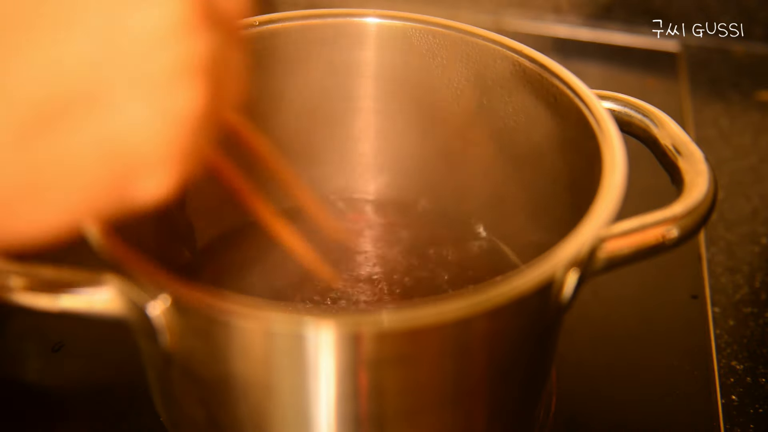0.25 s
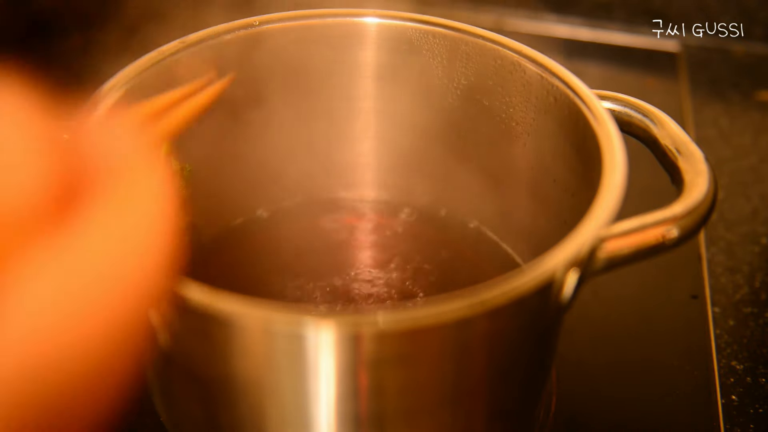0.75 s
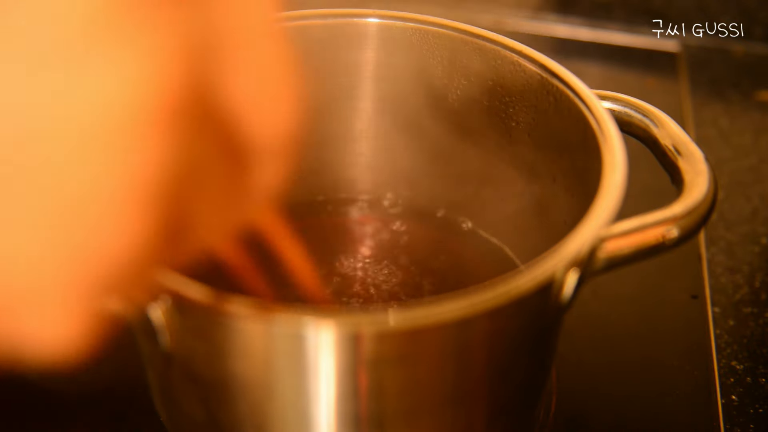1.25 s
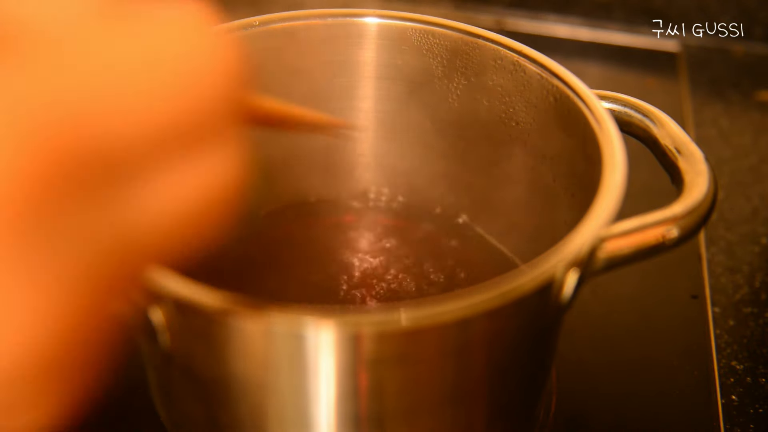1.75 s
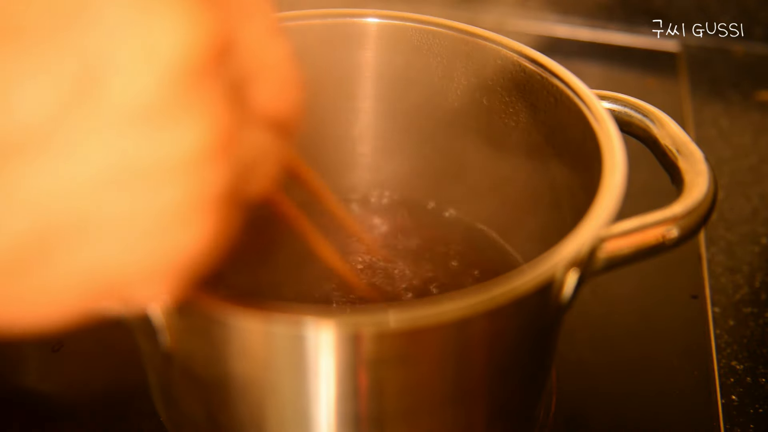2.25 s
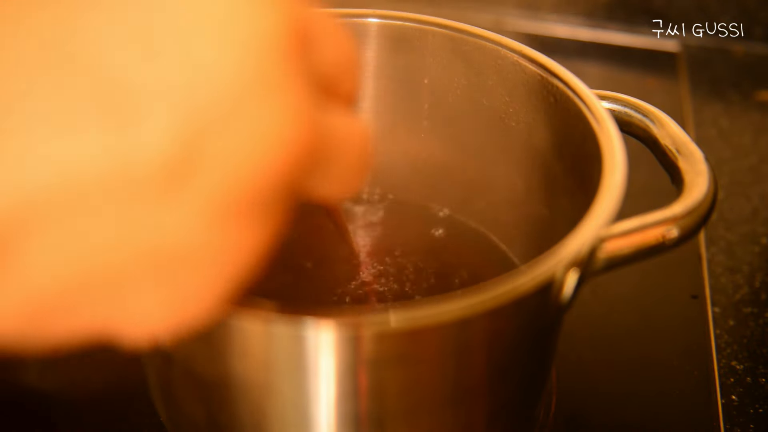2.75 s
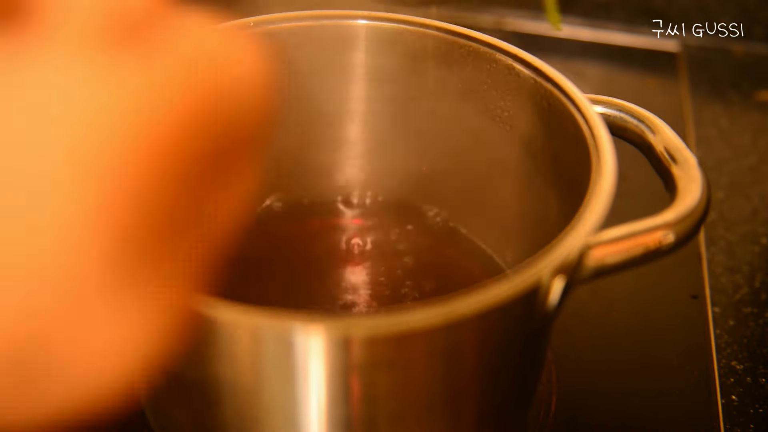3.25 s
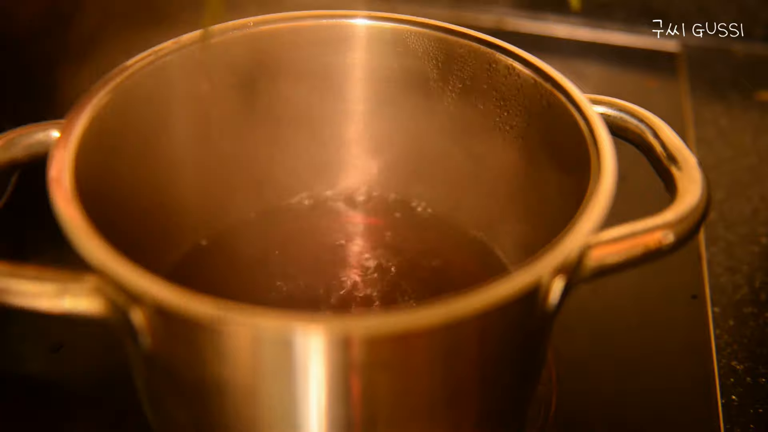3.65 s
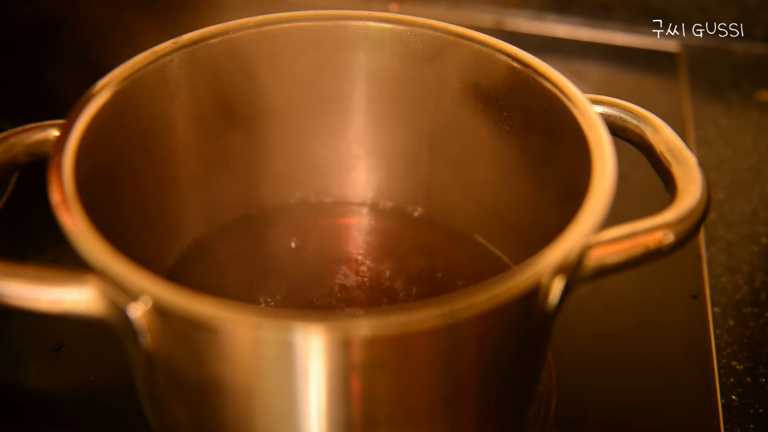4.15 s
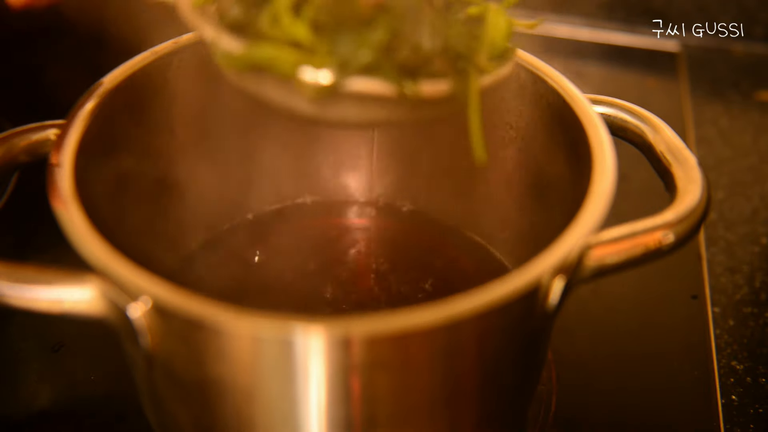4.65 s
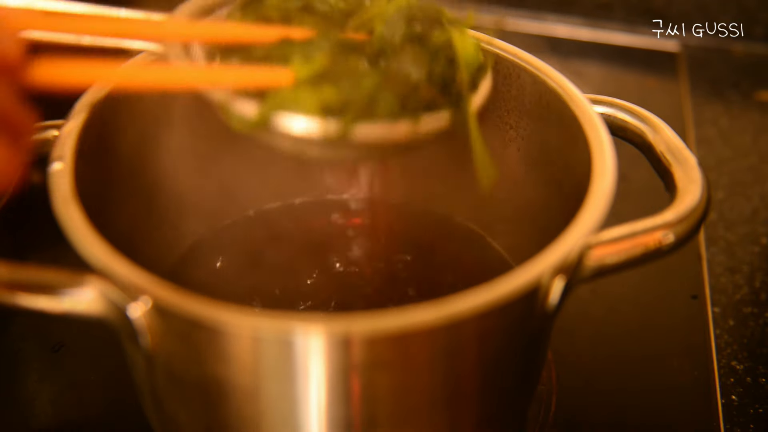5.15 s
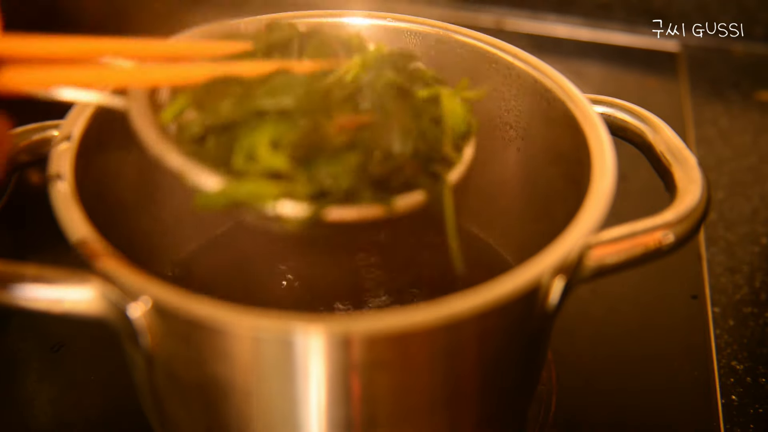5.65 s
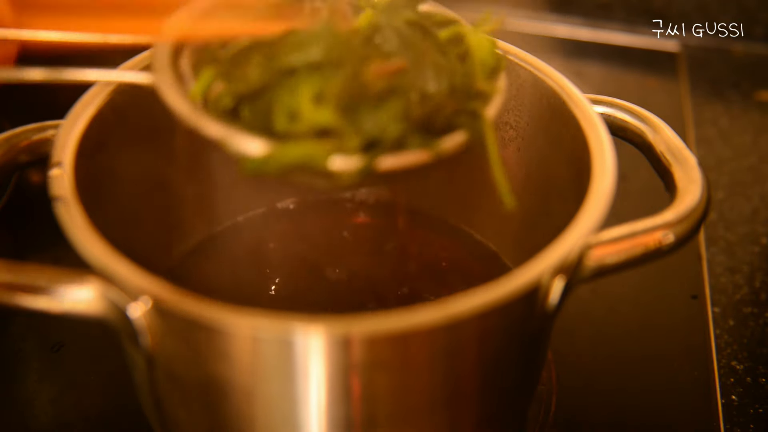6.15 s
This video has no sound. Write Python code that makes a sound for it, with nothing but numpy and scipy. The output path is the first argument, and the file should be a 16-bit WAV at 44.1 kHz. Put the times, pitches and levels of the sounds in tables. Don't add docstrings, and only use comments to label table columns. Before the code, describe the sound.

A faint steady boil murmurs in a metal pot, with airy hiss and fine spitting above it. Wooden sticks make light knocks and small bright ticks, with one loud steel clank early and a sharp tick around four seconds. After a calmer stretch, a strainer is shaken and tapped near five seconds, rattling thinly, and again near six, with watery plinks and plops. Close mono pickup, short soft room reflection.

```python
import sys
import numpy as np
from scipy import signal
from scipy.fft import rfft, irfft, next_fast_len
from scipy.io import wavfile
from scipy.ndimage import uniform_filter1d, map_coordinates

SR = 44100
rng = np.random.default_rng(int(sys.argv[2]) if len(sys.argv) > 2 else 0)


def wrap_up_sound(samples):
    columns = np.atleast_2d(samples).T
    tamed = np.clip(columns, -1, 1)
    steps = np.round(tamed * 32767).astype(np.int16)
    wavfile.write(sys.argv[1], SR, steps)


def convert_level_to_amplitude(level_db):
    exponent = np.asarray(level_db, float) / 20
    return 10 ** exponent


N = 281799


def unit(x):
    return x / np.sqrt(np.mean(x ** 2) + 1e-20)


def along(points, hz):
    f, value = np.transpose(points)
    return np.interp(np.log(hz + 1), np.log(f + 1), value)


def curve(rows):
    s, value = np.transpose(rows)
    return np.interp(np.arange(N) / SR, s, value)


def wobble(rate):
    knots = rng.standard_normal(int(N * rate / SR) + 4)
    return map_coordinates(knots, [np.arange(N) * rate / SR])


def filtered(x, response):
    m = next_fast_len(len(x) + 8192)
    return irfft(rfft(x, m) * response(np.fft.rfftfreq(m, 1 / SR)), m)[:len(x)]


def peak(f, hz, width_hz):
    return 1j * f * width_hz / (hz * hz - f * f + 1j * f * width_hz)


def add(track, s, sound):
    track[round(s * SR):][:len(sound)] += sound


def fizz(response, patchy_db, grain_db, grain_rate):
    z = signal.stft(rng.standard_normal(N), nperseg=2048)[2]
    field = uniform_filter1d(rng.standard_normal(z.shape), size=2, axis=0)
    field = uniform_filter1d(field, size=3, axis=1)
    patches = convert_level_to_amplitude(patchy_db * np.clip(unit(field), -3, 1.8))
    bed = unit(signal.istft(z * patches, nperseg=2048)[1][:N])
    grains = (rng.random(N) < grain_rate / SR) * np.clip(rng.standard_normal(N), -2, 2)
    return unit(filtered(bed + convert_level_to_amplitude(grain_db) * unit(grains), response))


def ring(modes, t, age, rough):
    knots = rng.standard_normal((len(modes), 2, len(t) // 180 + 2))
    total = 0
    for (hz, db, t60), (a, b) in zip(modes, knots):
        drift = np.interp(t * SR / 180, np.arange(len(a)), a + 1j * b)
        waver = 1 + rough * min(hz / 3500, 1) * drift
        total = total + convert_level_to_amplitude(db - 60 * age / t60) * np.imag(waver * np.exp(2j * np.pi * hz * t))
    return total


# f/Hz, width/Hz, level/dB
WALL = [(600, 21, -3.5), (1560, 27, 2), (3490, 22, 1), (4000, 29, -11), (4600, 23, -4), (6030, 83, 8)]


def wall(f):
    return 1 + 0.31 * sum(convert_level_to_amplitude(db) * abs(peak(f, hz, width)) for hz, width, db in WALL)


# t/s, level/dB
CHURN = [(0.0, -55), (0.1, -55), (0.55, -57.5), (1.05, -57.5), (1.33, -55), (1.94, -57.5), (2.13, -56.5),
         (3.01, -58), (3.47, -58), (4.41, -57.5), (4.63, -57), (5.2, -56), (5.48, -59), (5.73, -59.5),
         (6.01, -58), (6.39, -60.5)]
# f/Hz, level/dB per Hz
BOIL = [(180, -42), (300, -17), (362, -8), (404, -7.5), (429, -7.5), (603, -2), (668, -3.5), (820, -7.5),
        (901, -12.5), (1430, -13), (1570, -9.5), (1750, -16), (2300, -20), (2990, -32), (5060, -120)]


def boil():
    noise = fizz(lambda f: convert_level_to_amplitude(along(BOIL, f)) * wall(f), patchy_db=2.5, grain_db=-12, grain_rate=160)
    return convert_level_to_amplitude(curve(CHURN) + 1.74 + 0.55 * wobble(22)) * noise


# f/Hz, level/dB per Hz
RUMBLE = [(12, -45), (20, -8), (151, 0.5), (207, -3), (241, -2.5), (314, -3), (350, -7.5), (460, -25),
          (770, -120)]
RUMBLE_DB, RUMBLE_FOLLOWS = -62.5, 0.79


def rumble():
    churn_db = curve(CHURN)
    level_db = RUMBLE_DB + RUMBLE_FOLLOWS * (churn_db - churn_db.mean())
    return convert_level_to_amplitude(level_db) * fizz(lambda f: convert_level_to_amplitude(along(RUMBLE, f)), patchy_db=2.5, grain_db=-14, grain_rate=27)


# t/s of the crest, level/dB over the lull, length/s
SURGES = [(0.13, 4, 0.49), (0.65, 4, 0.31), (1.202, 3, 0.74), (1.64, 3.5, 0.38), (2.13, 5, 0.33),
          (2.66, 5, 0.29), (3.18, 3.5, 0.53), (3.793, 4.5, 0.33), (4.34, 3.5, 0.24), (4.912, 4.5, 0.25),
          (5.445, 3, 0.82), (5.92, 1, 0.67), (6.19, 5, 0.34)]
BUILD_SHARE = 0.53


def surging(late_s):
    t = np.linspace(0, N / SR, num=1000)
    s, db, length = np.transpose(SURGES)[:, :, None]
    crest = s + late_s
    half = length * np.where(t < crest, BUILD_SHARE, 1 - BUILD_SHARE)
    height_db = (db * np.exp(-((t - crest) / half) ** 2)).sum(axis=0)
    return np.interp(np.arange(N) / SR, t, height_db)


# f/Hz, level/dB per Hz
STEAM = [(1180, -36), (2000, -15.5), (2790, -5), (3590, -2), (3890, -1), (4310, -0.5), (4520, -3.5),
         (4670, -2), (5400, -12.5), (7020, -39), (11900, -120)]
LULL_DB = -59


def steam():
    noise = fizz(lambda f: convert_level_to_amplitude(along(STEAM, f)) * wall(f), patchy_db=3.5, grain_db=-17.5, grain_rate=400)
    return convert_level_to_amplitude(LULL_DB + 1.085 * surging(0) + 0.58 + 0.17 * wobble(12)) * noise


# f/Hz, level/dB per Hz
SEETHE = [(3120, -35), (5300, -5), (5540, -3.5), (6520, 1), (7400, -8), (9620, -45), (16300, -120)]
SEETHE_DB, SEETHE_FOLLOWS = -64.5, 0.91


def seethe():
    noise = fizz(lambda f: convert_level_to_amplitude(along(SEETHE, f)), patchy_db=5.5, grain_db=-6.5, grain_rate=300)
    return convert_level_to_amplitude(SEETHE_DB + SEETHE_FOLLOWS * surging(0)) * noise


# f/Hz, level/dB per Hz
SPIT = [(6820, -26), (11600, -4.5), (13100, 3), (15300, -2.5), (15800, -2.5)]
SPIT_DB, SPIT_YIELDS = -59.5, 0.78
SPIT_LATE_S = -0.0054
COVERED_S, COVER_DB = 4.5, -1.5


def spit():
    covered = np.clip((np.arange(N) / SR - COVERED_S) / 0.08, 0, 1)
    level_db = SPIT_DB - SPIT_YIELDS * surging(SPIT_LATE_S) + COVER_DB * covered
    return convert_level_to_amplitude(level_db) * fizz(lambda f: convert_level_to_amplitude(along(SPIT, f)), patchy_db=1.5, grain_db=-10, grain_rate=600)


# t/s, level/dB, f/Hz
GURGLES = [(0.103, -42, 570), (0.177, -41.5, 610), (0.205, -47, 640), (0.225, -39.5, 577),
           (0.272, -44, 554), (0.424, -51, 560), (0.466, -50, 640), (0.633, -53, 603), (0.714, -46, 656),
           (1.047, -44, 592), (1.133, -39, 650), (1.273, -40.5, 590), (1.319, -49, 585), (1.445, -44, 577),
           (1.584, -51, 614), (2.076, -57, 570), (2.113, -39, 610), (2.138, -43, 505), (2.172, -42.5, 635),
           (2.221, -36.5, 624), (2.274, -40, 630), (2.339, -45, 575), (2.419, -50, 600), (2.467, -50, 630),
           (2.485, -43, 596), (2.719, -45, 643), (2.756, -42, 574), (2.977, -48, 700), (3.023, -45, 600),
           (3.219, -45, 560), (3.285, -44, 635), (3.805, -49, 594), (4.005, -46, 565), (4.069, -44, 622),
           (4.118, -45, 660), (4.137, -43, 586), (4.248, -49, 635), (4.385, -52, 762), (4.708, -45, 615),
           (4.827, -51, 290), (4.856, -49, 236), (4.887, -53, 125), (4.9, -45, 620), (4.972, -49, 452),
           (5.037, -47, 590), (5.211, -39, 700), (5.982, -55, 577), (6.07, -45, 740), (6.35, -50, 719)]
GURGLE_CYCLES, GURGLE_RISE_S, GURGLE_DB = 17.6, 0.0037, -5


def gurgles():
    out, t = np.zeros(N + SR), np.arange(SR // 16) / SR
    for s, db, hz in GURGLES:
        shape = convert_level_to_amplitude(-60 * t * hz / GURGLE_CYCLES) * (1 - np.exp(-t / GURGLE_RISE_S))
        tone = np.sin(2 * np.pi * hz * t * (1.01 - 1.0 * t) + 6 * rng.random())
        add(out, s, convert_level_to_amplitude(db + GURGLE_DB) * shape / shape.max() * tone)
    return out[:N]


# t/s, level/dB, f/Hz
DROPS = [(0.052, -32.5, 1560), (0.544, -40.5, 1560), (0.9628, -28.5, 1570), (1.6006, -34.5, 1580),
         (2.247, -34, 1510), (2.656, -42, 1760), (2.835, -32.5, 1560), (4.146, -40.5, 1560),
         (1.198, -29.5, 1800), (4.2511, -35.5, 2270), (4.7048, -38, 1480), (4.816, -42, 1560),
         (5, -37, 1500), (5.1261, -46, 1440), (5.147, -36, 1560), (5.212, -33, 1510), (6.368, -40, 1560),
         (0.1336, -50, 1550), (0.3436, -44, 1680), (0.9128, -48, 1610), (1.7953, -50, 1550),
         (2.0572, -49, 1520), (2.372, -56, 1560), (2.5192, -50, 1550), (2.9008, -54, 1580),
         (2.9751, -49, 1390), (2.9941, -42, 1300), (3.052, -48, 1300), (4.098, -46, 1530),
         (4.5906, -46, 1560), (5.253, -42, 1570), (5.447, -48, 1560), (5.911, -43, 1580),
         (6.116, -52, 1370), (6.178, -41, 1370), (6.353, -45, 1350)]
# t/s, level/dB, f/Hz
PLOPS = [(4.5171, -45, 600), (4.7461, -48, 800), (5.9081, -34, 814), (5.9095, -35, 1130),
         (5.9361, -43, 760), (6.0856, -44, 729), (6.1171, -42, 1010), (6.1221, -42, 805),
         (6.1421, -39, 720), (6.1721, -44, 745), (6.1851, -34.5, 734), (6.2151, -50, 680)]
# t/s, level/dB, f/Hz
TINKS = [(0.0496, -40, 2580), (1.1975, -34, 2930), (1.205, -41, 2520), (2.4285, -41, 3700),
         (2.9936, -44, 2620), (3.3537, -37.5, 3300), (3.7871, -44, 3000), (4.2524, -33.5, 3900),
         (4.6531, -40.5, 2700), (4.7046, -45, 2600), (5.1474, -39, 2800), (5.176, -45, 2500),
         (5.4471, -31.5, 2500), (5.4486, -38, 3100), (5.9091, -34.5, 3330), (6.0591, -43, 3300),
         (6.0848, -31.5, 3320), (6.0893, -37, 3220)]
BUBBLE_CYCLES = 44, 35, 49
SPLASH_DB = 2, 10, 1
LANDING_DB = -6


def drops():
    out, t = np.zeros(N + SR), np.arange(SR // 8) / SR
    for rows, splash_db, cycles in zip((DROPS, PLOPS, TINKS), SPLASH_DB, BUBBLE_CYCLES):
        for s, db, hz in rows:
            t60 = cycles / hz
            shape = convert_level_to_amplitude(-60 * t / t60) * (1 - np.exp(-t / 0.00045))
            tone = shape * np.sin(2 * np.pi * hz * t * (0.981 + 1.6 * t))
            spray = rng.standard_normal(len(t)) * convert_level_to_amplitude(splash_db - 60 * t / t60)
            splash = filtered(spray, lambda f: peak(f, 1.08 * hz, 0.54 * hz) * peak(f, 1.08 * hz, 1.7 * hz))
            landing = rng.standard_normal(len(t)) * convert_level_to_amplitude(LANDING_DB - 60 * t / 0.0094)
            click = filtered(landing, lambda f: peak(f, 1430, 2600) ** 2)
            add(out, s + 0.00017, convert_level_to_amplitude(db - 2.0) * (tone + splash + click))
    return out[:N]


# f/Hz, level/dB, t60/s
RIM = [(155, -29.5, 0.11), (250, -30, 0.079), (347, -26, 0.061), (560, -36.5, 0.13), (700, -37, 0.19),
       (895, -32, 0.17), (1048, -28.5, 0.18), (1230, -27.5, 0.19), (1390, -34, 0.092), (1580, -30, 0.34),
       (2577, -25.5, 0.28), (2755, -24, 0.1), (3515, -25, 0.28), (3620, -26, 0.22), (3990, -25, 0.33),
       (3900, -26, 0.23), (4600, -36, 0.43), (4950, -29, .2), (5190, -17, 0.18), (5320, -28, 0.19),
       (6212, -17, 0.12), (6840, -34, .18), (7200, -30, .15), (7660, -23, 0.15), (8177, -25, 0.15),
       (8600, -40, .12)]
# f/Hz, level/dB, t60/s
SIDE_WALL = [(635, -27, 0.36), (1550, -4.5, 0.27), (2410, -14, .08), (2700, -9, 0.087), (3068, -12, .1),
             (3550, -31, 0.27), (4000, 1.5, 0.18), (4600, -25, 0.33), (5740, -23, 0.27), (6100, -10, .08),
             (6140, -0.5, 0.077), (7520, -6, 0.07), (8840, -14, 0.092)]
# f/Hz, level/dB, t60/s
HOOP = [(560, -14, .12), (1120, -19, 0.13), (1597, -9.5, 0.13), (3500, -10, 0.1), (4030, -4.5, 0.11),
        (6860, -24, 0.055), (8700, -11, 0.045)]
# f/Hz, level/dB, t60/s
RIM_CLANK = [(1215, -17, 0.0073), (1340, -19, 0.0089), (1435, -15, 0.0067), (2630, -18, 0.03),
             (3997, 0, 0.025), (4990, -12, 0.022), (5230, -12.5, 0.015), (6140, -14, 0.008),
             (6980, -39, .03), (7730, -14.5, 0.017), (9050, -20, .012), (10200, -30, .02)]
# f/Hz, level/dB, t60/s
SIDE_CLANK = [(2270, -9, 0.047), (2960, 3, 0.039), (4700, -21, .04), (5950, -1, .05), (7450, -2, 0.037),
              (9500, -4, .03), (11200, -11, 0.018)]
# f/Hz, level/dB, t60/s
HOOP_CLANK = [(502, -3.5, 0.019), (1626, -5.5, 0.034), (2467, 1.5, 0.033), (3050, 0, 0.015),
              (4000, -2, 0.06), (5080, -10, .02), (6000, -18, .015), (8500, -19, .025)]
# t/s, ring level/dB, clank level/dB, contact/s, crack level/dB
BLOWS = [
    (1.4853, -10.5, -10.5, 0.011, -15),
    (1.1132, -34.5, -40, 0.0054, -29),
    (5.2753, -31.5, -32.5, 0.0049, -28.5),
]
RISE_S, SLOSH = (0.0011, 0.0003, 0.00045), (0.23, 0.12, 0.25)
REBOUND_S, REBOUND_DB = 0.009, (-34, -5, -19)


def dense_steel(f):
    return peak(f, 4500, 7100) * peak(f, 4000, 9400) * peak(f, 5700, 11400)


def blows():
    out, t = np.zeros(N + SR), np.arange(SR // 2) / SR
    bodies = [(RIM, RIM_CLANK), (SIDE_WALL, SIDE_CLANK), (HOOP, HOOP_CLANK)]
    for blow, (free, damped), rise, slosh, second_db in zip(BLOWS, bodies, RISE_S, SLOSH, REBOUND_DB):
        s, ring_db, clank_db, contact, crack_db = blow
        after = np.sqrt((t - contact) ** 2 + 0.0024 ** 2) / 2 + (t - contact) / 2
        clank = convert_level_to_amplitude(clank_db) * ring(damped, t, after, rough=0.068)
        steel = convert_level_to_amplitude(ring_db) * ring(free, t, t, rough=slosh) + clank
        fade = convert_level_to_amplitude(-60 * t / 0.032) + 0.18 * convert_level_to_amplitude(-60 * t / 0.23)
        crack = convert_level_to_amplitude(crack_db) * fade * filtered(rng.standard_normal(len(t)), dense_steel)
        add(out, s, (1 - np.exp(-t / rise)) * steel + (1 - np.exp(-t / 0.0003)) * crack)
        rebound = convert_level_to_amplitude(clank_db) * ring(damped, t, after, rough=0.22) + crack
        add(out, s + REBOUND_S, convert_level_to_amplitude(second_db) * rebound)
    return out[:N]


# t/s, level/dB, centre f/Hz, mid band
# level/dB
TICKS = [(0.085, -38.5, 10500, -19), (.1125, -46, 10000, -20), (0.3824, -46, 12500, -20),
         (0.4384, -41, 12300, -18), (.55, -45, 8500, -15), (.744, -47, 9000, -15), (0.8744, -44, 11000, -9),
         (.893, -46, 8500, -15), (.955, -47, 9500, -15), (1.074, -48, 7370, -1), (1.198, -38, 5500, 3),
         (1.6001, -43, 7500, -10), (1.7945, -28, 9050, -16), (1.8045, -38, 8500, -15),
         (1.8225, -44, 11000, -23), (2.028, -47, 10000, -15), (2.157, -43, 10000, -15),
         (2.6563, -30.5, 6240, -9), (2.6563, -32.5, 8800, -20), (3.353, -36, 10200, 2),
         (3.7807, -40, 9150, -6), (4.0227, -45, 8000, -7), (4.103, -21, 8760, -23.5), (4.439, -41, 9420, 0),
         (4.7501, -41, 7500, -10),
         (4.801, -36, 7800, -19), (4.8253, -39, 7760, -30), (5.006, -35.5, 8500, -23),
              (5.097, -32.5, 11500, -21), (5.1355, -45, 6000, -13), (5.1447, -36, 7500, -23),
              (5.148, -27, 12000, 3), (5.148, -34, 7000, -4), (5.176, -32, 9000, 2),
              (5.2075, -35, 6500, -2), (5.216, -32, 7660, -8), (5.223, -29, 7200, -15),
              (5.2445, -39, 7360, -19), (5.2514, -40, 7630, -3), (5.237, -41, 5000, -4),
              (5.275, -41, 13600, -10), (5.314, -32, 6000, -5), (5.3134, -33, 11500, -1),
              (5.412, -45, 8500, -26), (5.4483, -29.5, 8150, 5), (5.456, -36, 8100, 1),
              (5.91, -40.5, 6840, -15), (6.0046, -30, 10500, -21), (6.059, -36, 7920, -7),
              (6.0836, -41, 7660, -12), (6.118, -38, 9000, -10), (6.12, -32, 8500, -7),
              (6.139, -35, 11500, -5), (6.171, -32, 8500, -9), (6.187, -48, 10400, -4),
              (6.2186, -33.5, 8200, -9), (6.2694, -49, 6860, -8), (6.346, -36, 8100, -9),
              (6.352, -32.5, 8800, -1)]
TICK_T60_S = 0.035
TOP_BAND_DB, TOP_LOSS, TOP_GAIN = -17, 0.44, 2.6


def ticks():
    out, t = np.zeros(N + SR), np.arange(SR // 8) / SR
    for s, db, hz, mid_db in TICKS:
        top_db = TOP_BAND_DB - TOP_LOSS * (db + 46) + TOP_GAIN * (hz - 9000) / 1000
        fade = convert_level_to_amplitude(-60 * t / TICK_T60_S) + 0.89 * convert_level_to_amplitude(-60 * t / 0.0035)
        puff = rng.standard_normal(len(t)) * fade + 7 * (t == 0)
        wire = lambda f: (peak(f, hz, 4300) ** 2 - convert_level_to_amplitude(mid_db + 1.5) * peak(f, 2600, 3900) ** 2
                          - convert_level_to_amplitude(top_db + 4) * peak(f, 15300, 5000) ** 2)
        tick = filtered(puff, wire)
        add(out, s + 0.00056, convert_level_to_amplitude(db + 0.5) * tick / abs(tick).max())
    return out[:N]


# t/s, level/dB, thump level/dB, upper level/dB, t60/s
KNOCKS = [
    (0.048, -34.5, -14, -6, 0.068),
    (0.061, -41, -2.5, -15, 0.049),
    (1.197, -39, -21, -3, 0.08),
    (1.212, -57, -22, -3, 0.04),
    (2.244, -41, -32, -22, 0.041),
    (2.993, -47, -21, -6, 0.12),
    (3.049, -51, -13, -14, 0.054),
    (5.175, -39, 1, -13, 0.023),
    (5.182, -42.5, 4, -11, 0.034),
    (5.2741, -36, -7.5, 0, 0.042),
]


def knocks():
    out, t = np.zeros(N + SR), np.arange(SR // 4) / SR
    for s, db, thump_db, upper_db, t60 in KNOCKS:
        puff = rng.standard_normal(len(t)) * convert_level_to_amplitude(-60 * t / t60) + 5 * (t == 0)
        wood = lambda f: (peak(f, 500, 410) + convert_level_to_amplitude(upper_db - 5) * peak(f, 820, 1640)) * peak(f, 720, 3500)
        body = filtered(puff, wood)
        shape = convert_level_to_amplitude(thump_db - 60 * t / (0.82 * t60)) * (1 - np.exp(-t / 0.0015))
        thump = shape * np.sin(2 * np.pi * 148 * t)
        add(out, s + 0.00147, convert_level_to_amplitude(db) * (convert_level_to_amplitude(12.0) * body + convert_level_to_amplitude(9.5) * thump))
    return out[:N]


# t/s, length/s, f/Hz, level/dB
GRAZES = [(0.054, 0.15, 4600, -54), (1.0, 0.07, 3500, -59), (1.07, 0.093, 4600, -51.5),
          (1.458, 0.024, 7700, -47), (1.463, 0.018, 4000, -42), (1.444, 0.026, 600, -48),
          (3.163, 0.054, 4420, -55), (3.422, 0.12, 4800, -60.5), (4.27, 0.13, 4600, -59),
          (5.865, 0.12, 3490, -55.5), (5.871, 0.12, 4600, -59)]


def grazes():
    out = np.zeros(N + SR)
    for s, length, hz, db in GRAZES:
        t = np.arange(round(length * SR)) / SR
        shape = np.minimum(t / 0.0071, 1) * (1 - t / length) ** 0.5
        add(out, s, shape * ring([(hz, db + 1.0, 9)], t, t, rough=0.29))
    return out[:N]


# t/s, length/s, centre f/Hz, width/Hz, level/dB
STROKES = [(0.203, 0.12, 556, 250, -54), (0.082, 0.23, 9500, 5000, -58.5),
           (0.274, 0.077, 11000, 11000, -51.5), (.51, 0.1, 8000, 5000, -56.5),
           (0.59, 0.14, 9700, 3000, -56), (1.302, 0.24, 9500, 5000, -60), (1.554, 0.16, 10200, 8000, -54),
           (2.978, 0.102, 960, 1900, -53), (2.984, 0.075, 2540, 1500, -63), (5.2, 0.074, 9000, 9000, -58),
           (6.09, 0.095, 7000, 8000, -54.5)]


def strokes():
    out = np.zeros(N + SR)
    for s, length, hz, width_hz, db in STROKES:
        u = np.arange(round(length * SR)) / (length * SR)
        bursts = uniform_filter1d(1. * (rng.random(len(u)) < 0.006), size=30)
        crackle = rng.standard_normal(len(u)) * (1 + 12 * bursts)
        flutter = convert_level_to_amplitude(1.2 * np.interp(u * length * 60, np.arange(20), rng.standard_normal(20)))
        shape = flutter * np.minimum(u / 0.32, 1) * np.minimum((1 - u) / 0.2, 1)
        add(out, s, convert_level_to_amplitude(db) * shape * unit(filtered(crackle, lambda f: peak(f, hz, width_hz) ** 2)))
    return out[:N]


# t/s, level/dB
STIRRING = [(0.0, -63), (0.98, -63.5), (1.53, -58.5), (1.83, -66.5), (2.26, -60.5), (2.44, -65.5),
            (3.04, -61.5), (3.49, -66.5), (4.2, -63.5), (4.54, -64.5), (5.16, -63), (5.68, -66),
            (6.21, -64.5), (6.39, -67)]
# f/Hz, level/dB per Hz
RUSTLE = [(4290, -23), (7300, -7), (8300, -4.5), (8370, -4), (9890, -4.5), (11700, -7.5), (15200, -42),
          (22000, -120)]


def rustle():
    noise = fizz(lambda f: convert_level_to_amplitude(along(RUSTLE, f)), patchy_db=2.5, grain_db=-7, grain_rate=340)
    return convert_level_to_amplitude(curve(STIRRING) + 1.0) * noise


# f/Hz, t60/s
KITCHEN = [(200, 0.36), (2000, 0.17), (6000, 0.053), (12000, 0.063)]


def kitchen(x):
    hz, t, z = signal.stft(rng.standard_normal(SR // 2), SR, nperseg=256)
    tail = signal.istft(z * convert_level_to_amplitude(-60 * t / along(KITCHEN, hz)[:, None]), SR, nperseg=256)[1]
    delayed = np.pad(x, (150, 0))
    return signal.fftconvolve(delayed, tail / np.linalg.norm(tail))[:N]


BLUNT_HZ = 14800


def scene():
    blunt = filtered(blows() + strokes(), lambda f: 1 / (1 + (f / BLUNT_HZ) ** 16))
    near = blunt + grazes() + ticks() + knocks()
    inside = drops() + gurgles()
    room = kitchen(convert_level_to_amplitude(-12.0) * near + convert_level_to_amplitude(-13) * inside)
    simmer = boil() + steam() + rumble()
    stirred = convert_level_to_amplitude(0.8 * wobble(23)) * (rustle() + spit() + seethe())
    return (near + inside + room + simmer + stirred)[None]


def band_limit(x):
    return signal.sosfilt(signal.butter(12, 16640, fs=SR, output="sos"), x)


TOP_HZ, TOP_GATE_DB = 15750, -59


def record(dry):
    body = filtered(dry[0], lambda f: f < TOP_HZ)
    top = filtered(dry[0], lambda f: (f >= TOP_HZ) * (f < 16600))
    power = abs(uniform_filter1d(top ** 2, size=256)) / convert_level_to_amplitude(2 * TOP_GATE_DB)
    gate = convert_level_to_amplitude(-36) + power ** 2 / (1 + power ** 2)
    mix = body + top * gate
    return band_limit(mix[None])


dry = scene()
out = record(dry)
wrap_up_sound(out)
```